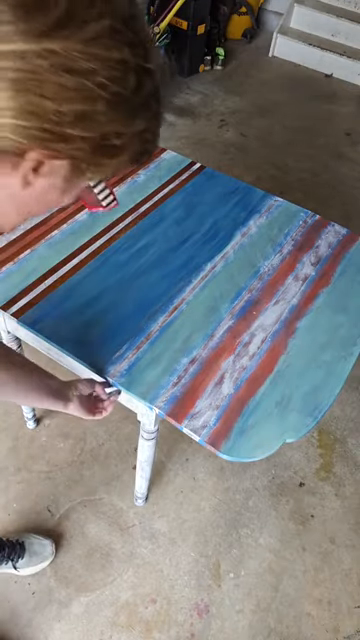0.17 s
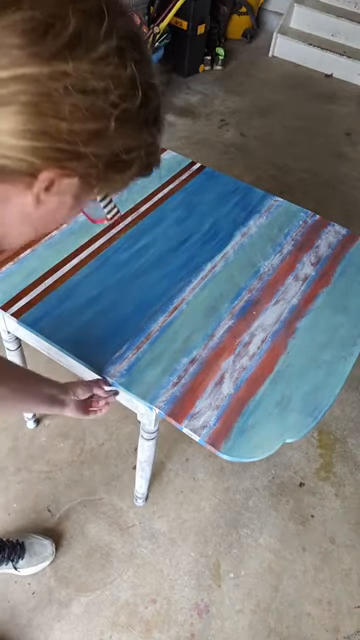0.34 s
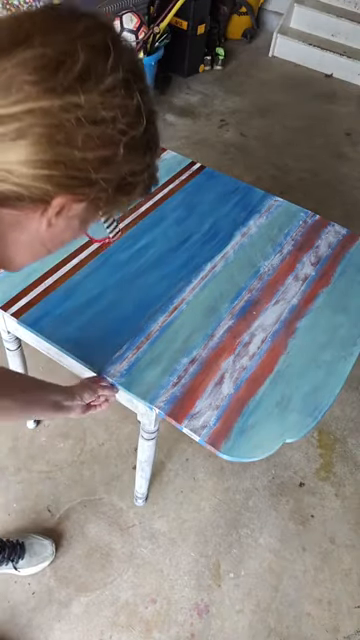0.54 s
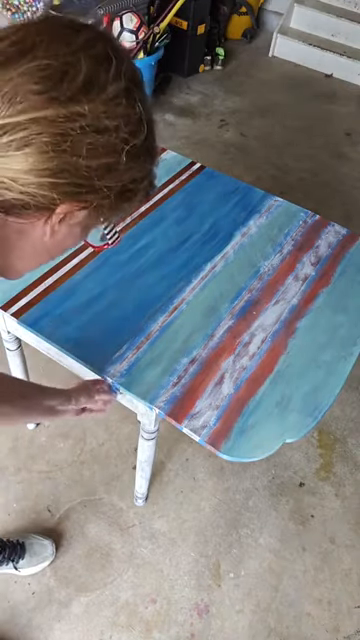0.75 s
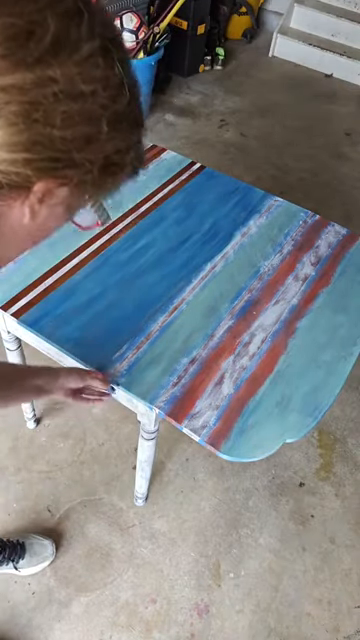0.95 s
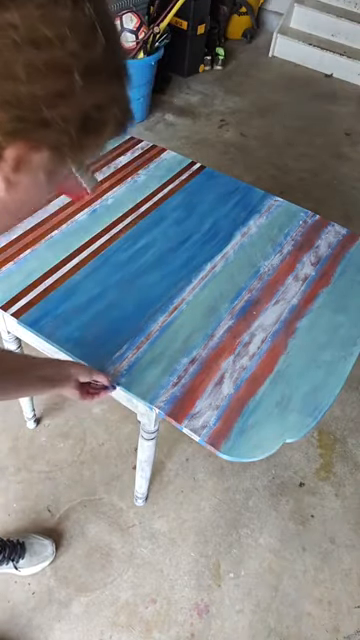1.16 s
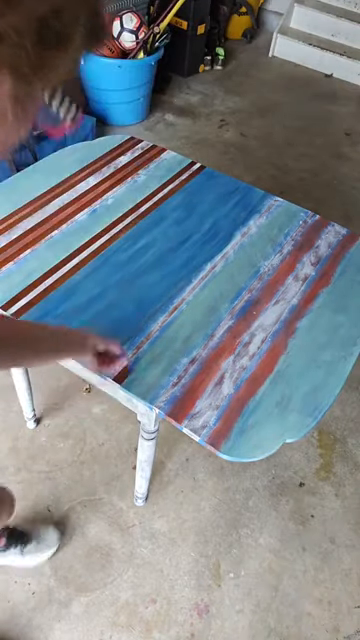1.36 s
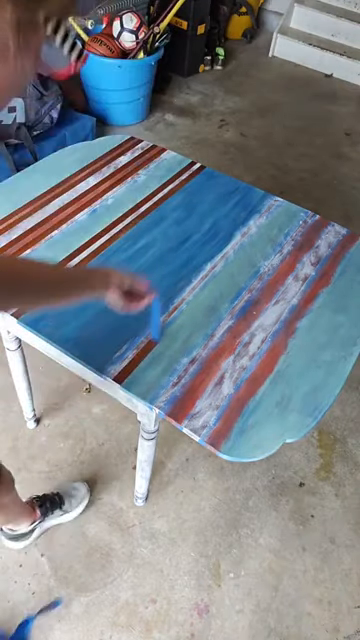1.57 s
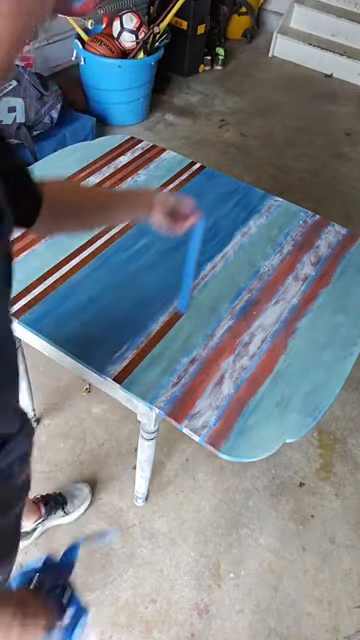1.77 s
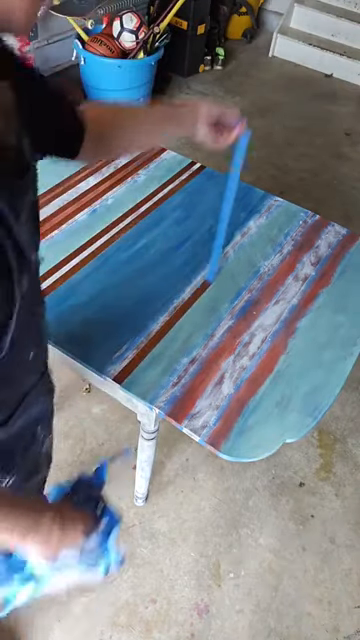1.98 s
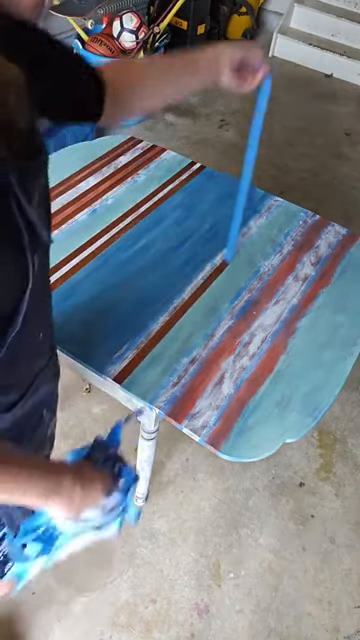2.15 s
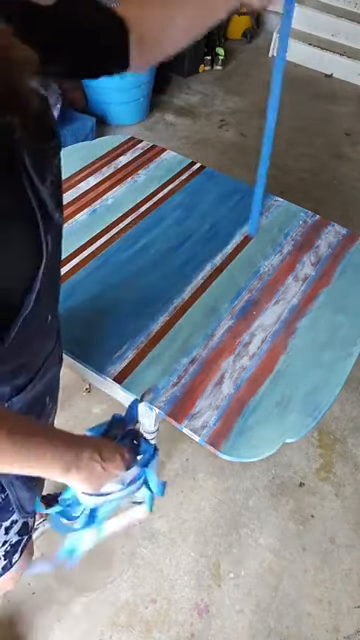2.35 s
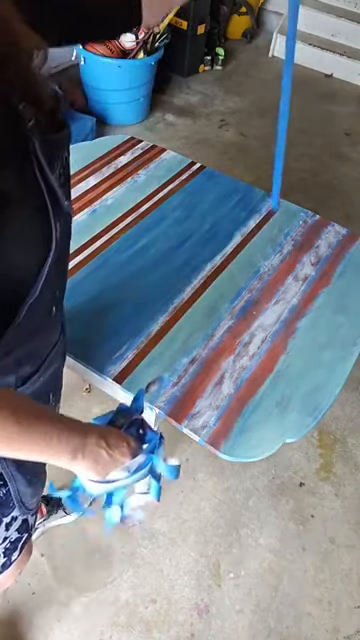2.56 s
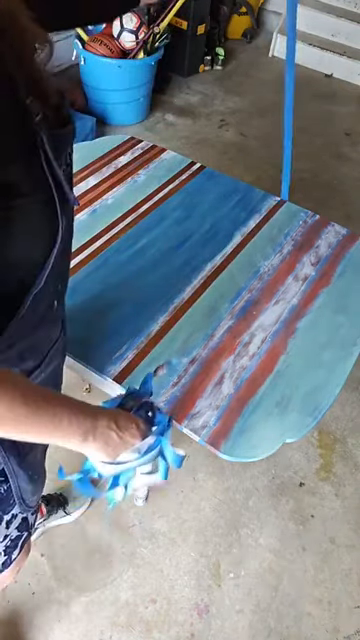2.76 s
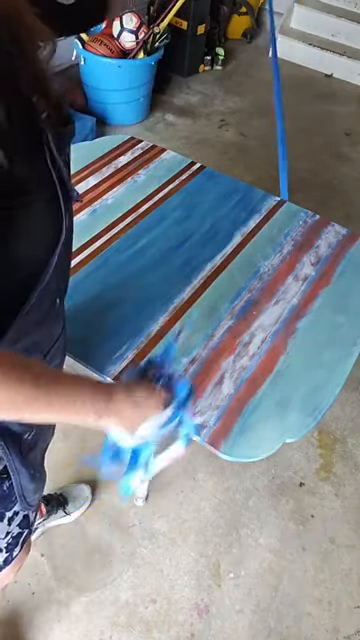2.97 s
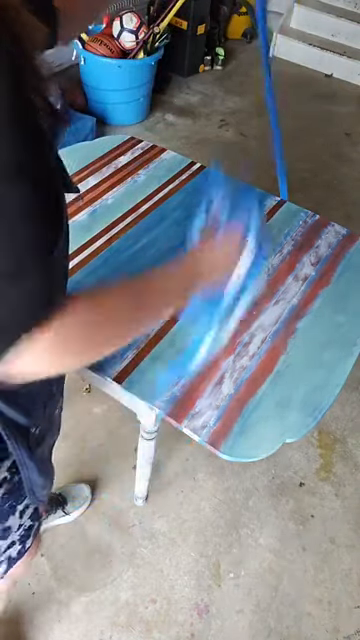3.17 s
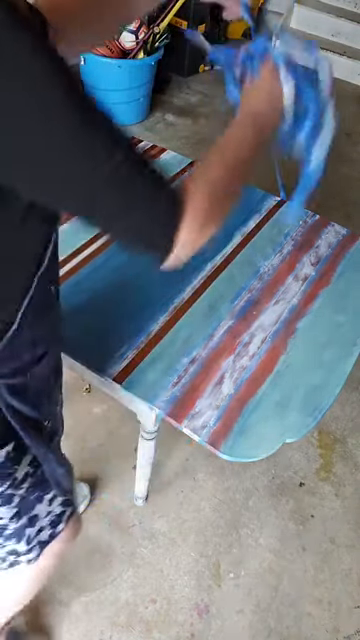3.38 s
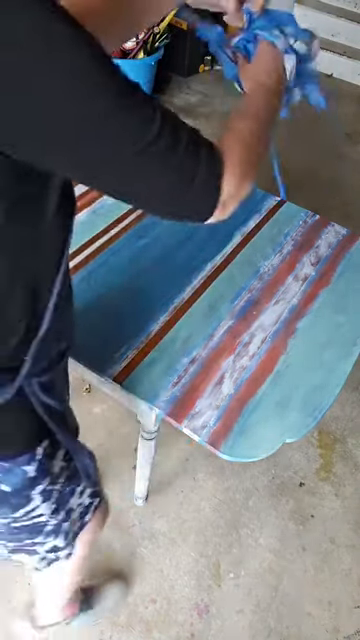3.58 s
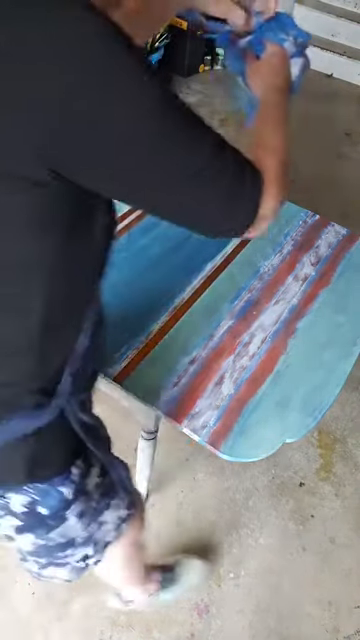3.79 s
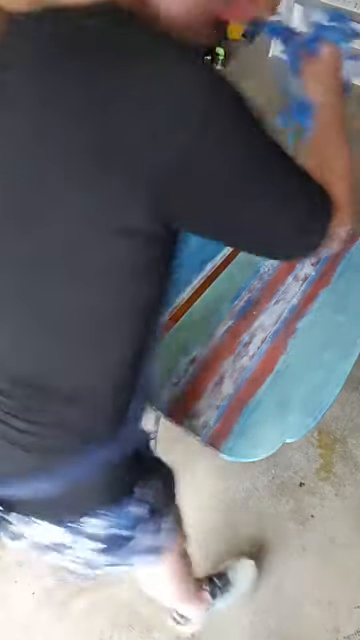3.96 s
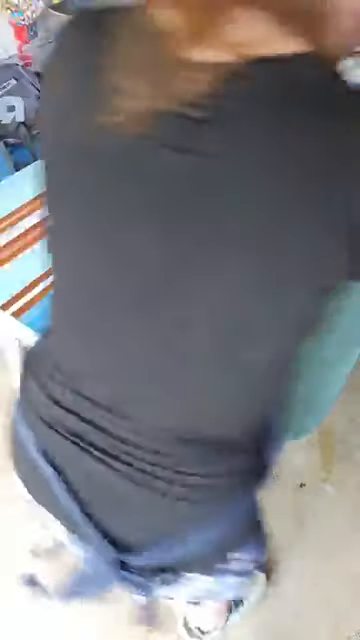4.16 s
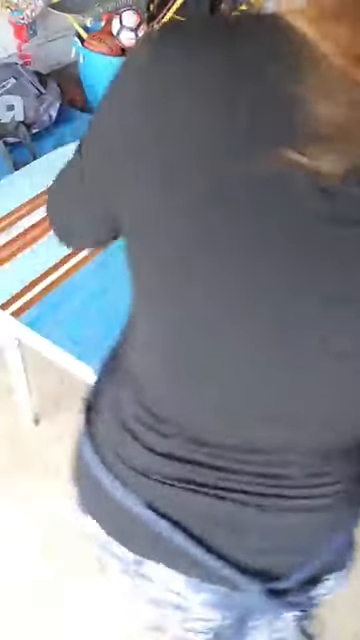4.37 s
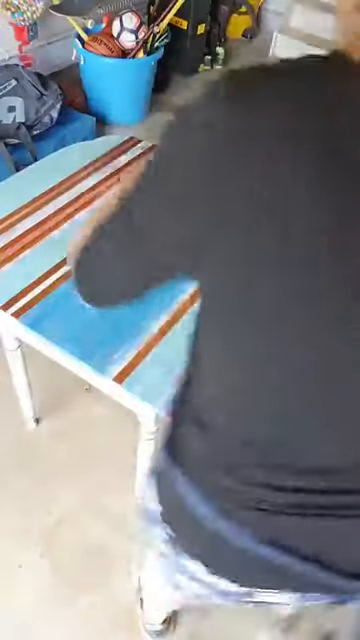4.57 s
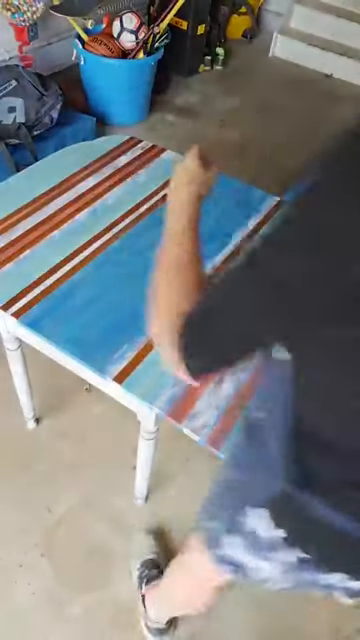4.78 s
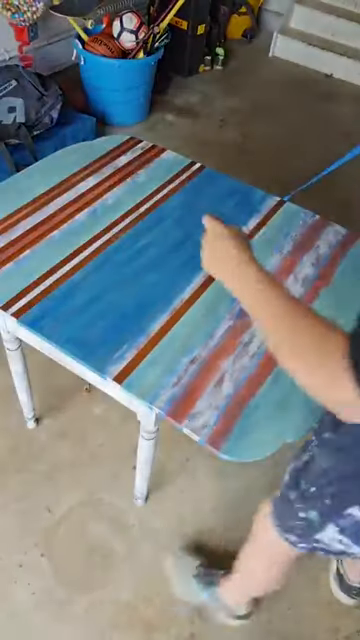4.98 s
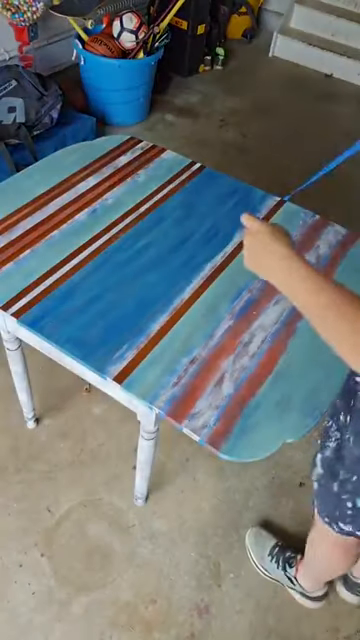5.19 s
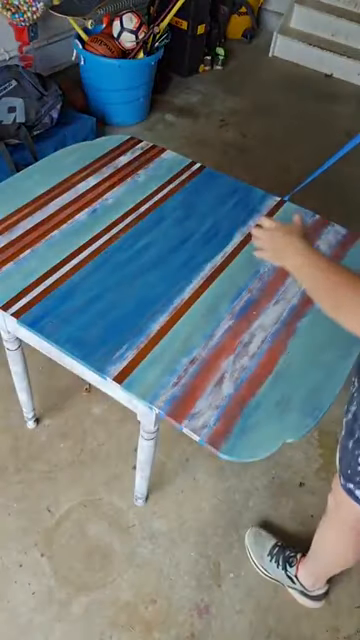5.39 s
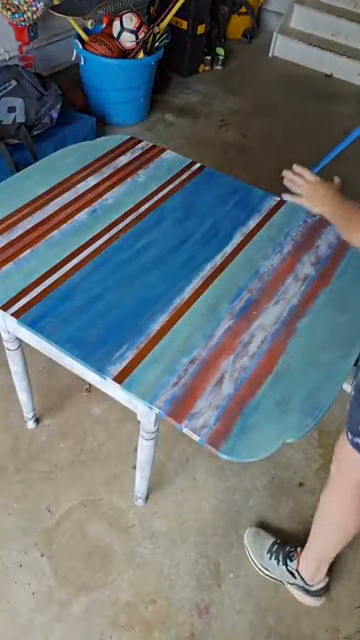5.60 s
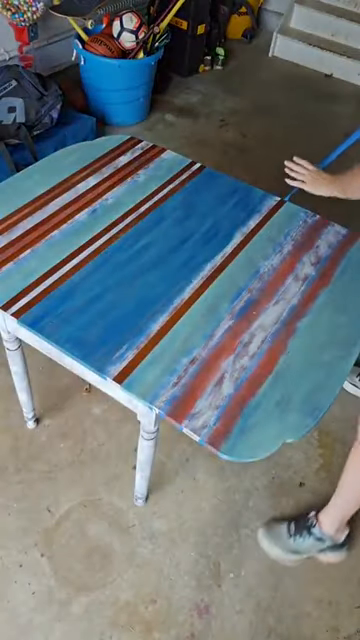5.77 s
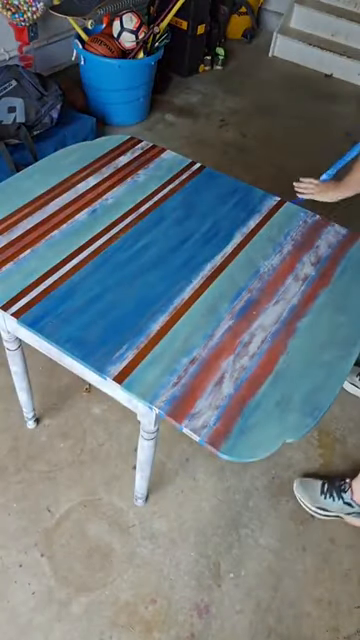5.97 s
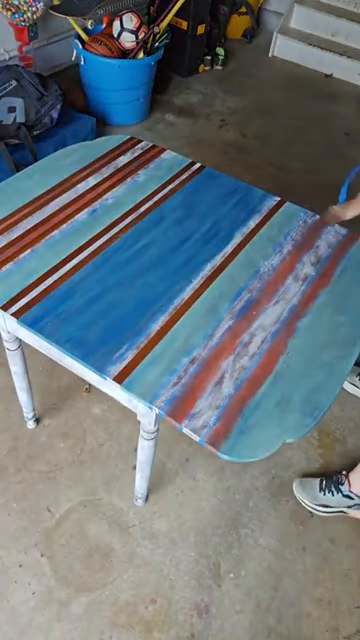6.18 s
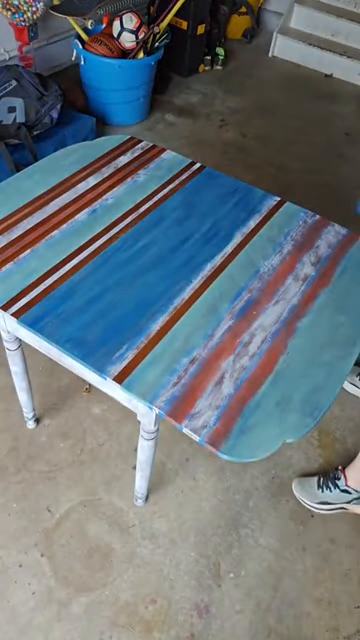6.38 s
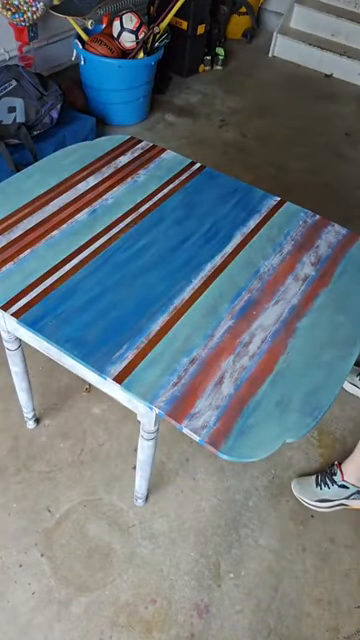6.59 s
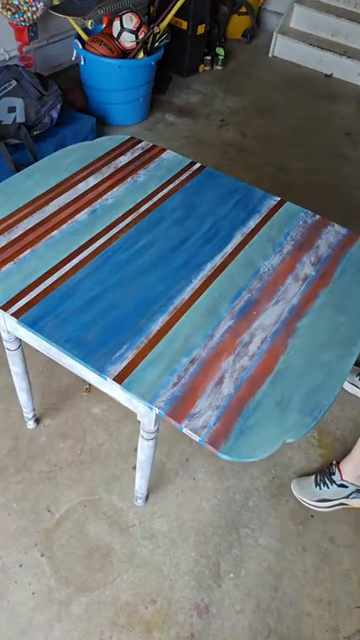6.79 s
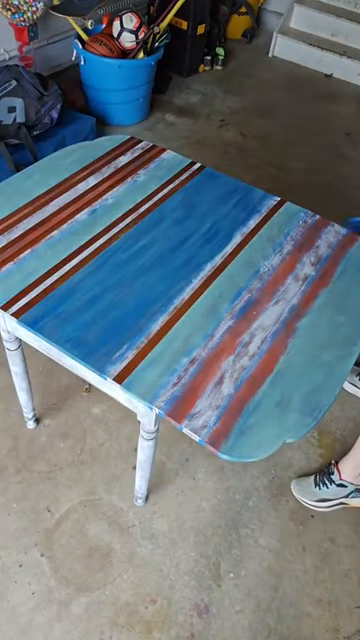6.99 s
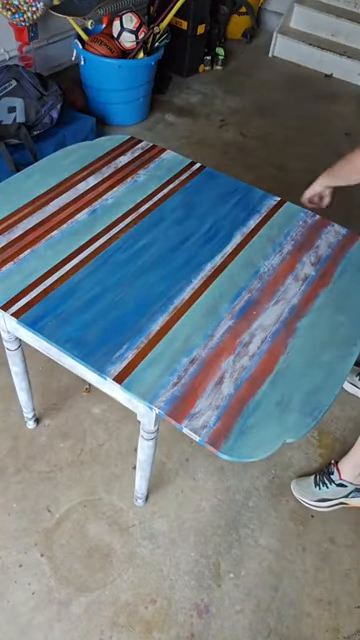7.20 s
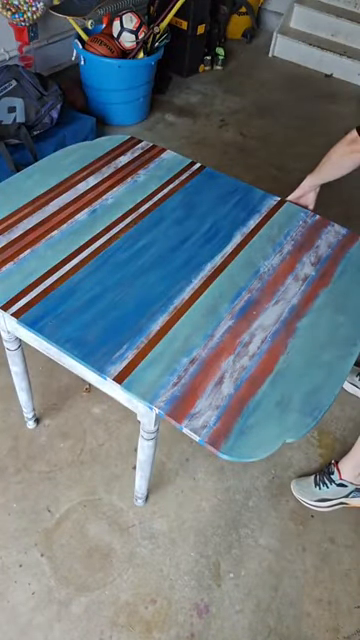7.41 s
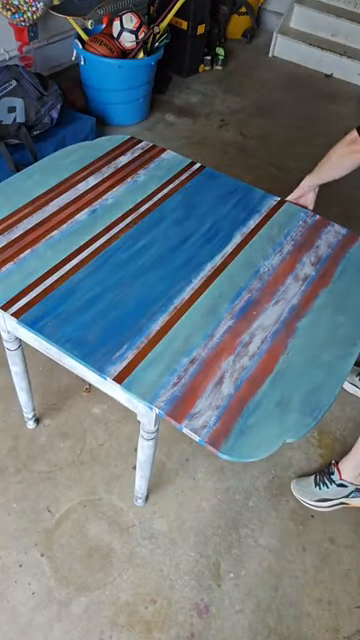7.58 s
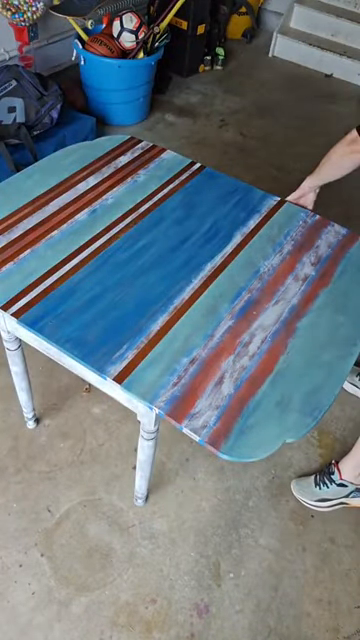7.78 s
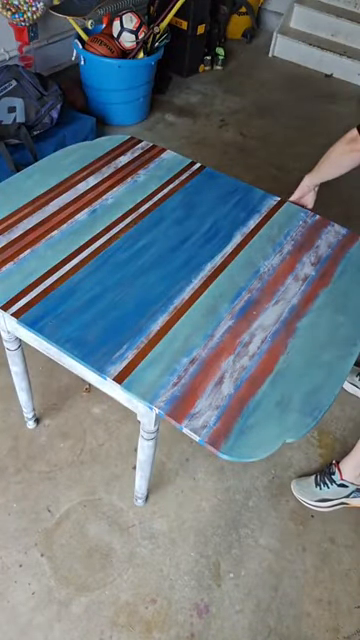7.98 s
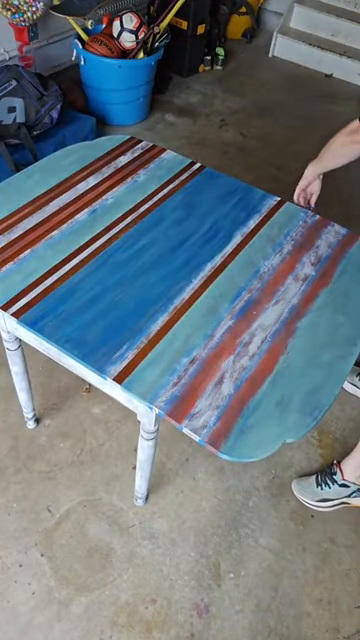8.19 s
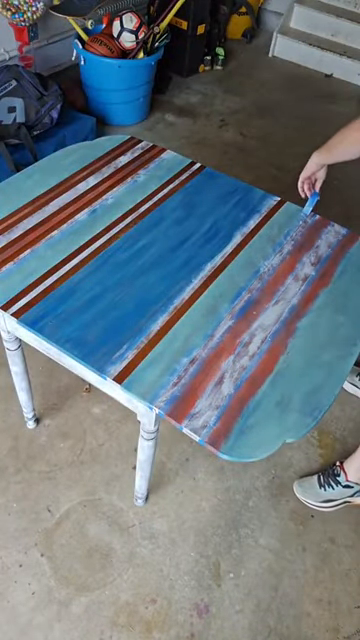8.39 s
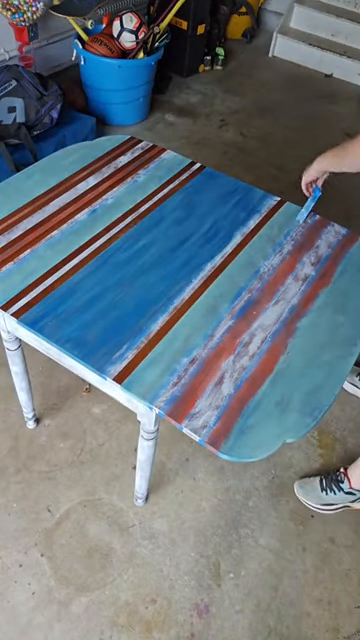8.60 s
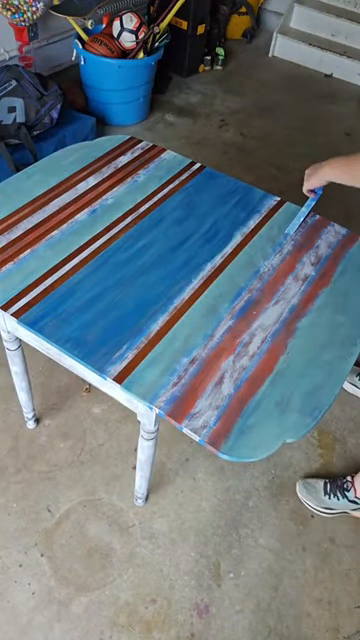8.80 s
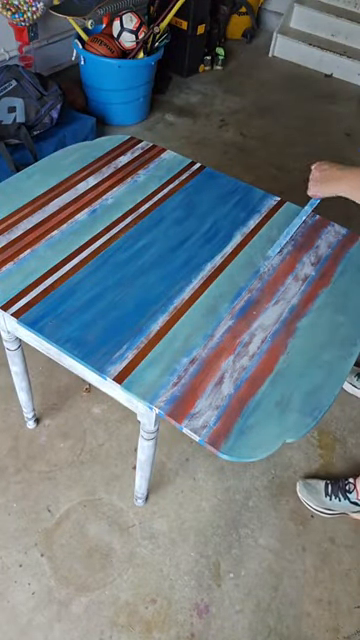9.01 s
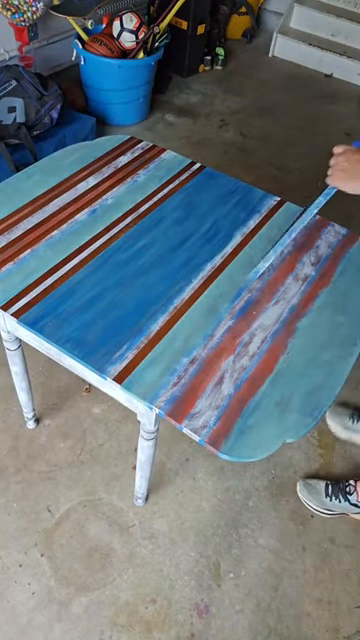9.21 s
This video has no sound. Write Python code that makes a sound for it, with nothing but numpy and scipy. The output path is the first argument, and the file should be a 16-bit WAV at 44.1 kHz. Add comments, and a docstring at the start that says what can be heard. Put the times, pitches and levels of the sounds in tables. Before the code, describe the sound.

In a bare, reverberant garage with a faint low hum, a small sharp snap and fingernail pick precede a long tape peel off a wooden table, drumming and rasping, rising in pitch as it speeds up. The loose tape crackles into a wad, shoes step and scuff on gritty concrete, more crumpling follows, then a second, shorter peel begins. Stereo microphones near the table catch the echo.

```python
"""Masking tape pulled off a table

Masking tape is pulled off a painted wooden table in a garage, in two rasping strips: tiny snaps of glue
drum on the resonant top and fizz in the air. Around the pulls, clumped crackles make the loose tape
crumple into a wad, and filtered grit makes shoes scuff and step on the concrete.
Sines and a wandering drone make machinery hum and waver faintly, over soft filtered-noise hiss."""
import sys
import numpy as np
from scipy import signal
from scipy.fft import rfft, irfft, next_fast_len
from scipy.io import wavfile
from scipy.ndimage import uniform_filter1d

SR = 44100
rng = np.random.default_rng(int(sys.argv[2]) if len(sys.argv) > 2 else 0)


def materialize(psi):
    """Save the field psi as 16-bit PCM at rate SR to the path in sys.argv[1].

    A 1-D psi becomes a single channel; in a 2-D psi each row is a channel.
    """
    bounded = np.clip(np.atleast_2d(psi).T, -1, 1)
    quanta = np.round(bounded * 32767).astype(np.int16)
    wavfile.write(sys.argv[1], SR, quanta)


N = 407925
TIME = np.arange(N) / SR

# modes of the table top: f/Hz, t60/s, level/dB along the first strip, level/dB along the second
TOP = [(63, .22, -5, -40), (97, .22, 1, -24), (133, .25, 1, 3), (151, .22, -1, -7), (229, .16, -12, -2),
       (262, .24, 1, -5), (291, .24, 4, -2), (347, .13, 4, 5), (481, .3, -2, -7), (547, .2, 0, 1),
       (667, .14, -3, -6), (806, .14, -1, -10), (888, .26, 1, 0), (975, .14, -4, -11), (1226, .22, -5, -7),
       (1644, .2, -9, -9)]


def amp(db):
    """Decibels to gain."""
    return 10 ** (np.asarray(db) / 20)


def evened(x):
    """Scales to an rms of 1."""
    return x / np.sqrt(np.mean(x ** 2) + 1e-20)


def peel(strip):
    """Threads of glue snap in uneven slips: each plucks the table and ticks in the air."""
    # spectrum of the board between its modes: f/Hz, level/dB
    board = [(85, -84), (135, 3), (195, -12.5), (300, 2.5), (600, 4), (900, 4.5), (1400, -4.5),
             (2000, -4.5), (3000, -13), (4500, -19), (7000, -29), (12000, -23)]
    # spectrum of the ticks in the air: f/Hz, level/dB
    tick_colour = [(900, 4.5), (2000, -3.5), (3200, -6), (4500, -4.5), (6500, -7), (9500, -7), (11000, -11),
                   (15500, -8)]
    easy_hz, split_hz, thump_hz = 400, 720, 152
    board_db, chatter_db, drum_db, crackle_db = 2, -8, -2, 2.5

    drum_gain, chatter_hz, fizz_gain = pull(strip, easy_hz)
    octaves = np.log2(chatter_hz / easy_hz)
    threads = shifting(grains(per_s=1600, spread_db=0.0, clump_db=2.0, clump_hz=89.7))

    # the peel line chatters at a pitch that follows the speed
    chatter = resonate(resonate(threads, chatter_hz, 93), chatter_hz, 80.6)
    chatter = amp(chatter_db) * evened(band(chatter, 190, "high"))

    # thump and rasp both grow as the pull gets faster
    wood = evened(table_top(threads, strip)) + amp(board_db) * evened(colour(threads, board))
    low = amp(drum_db) * evened(band(wood, split_hz, "low"))
    thump = amp(-3 + 3.5 * octaves) * band(low, thump_hz, "low")
    drum = band(low, thump_hz, "high")
    rasp = amp(-5.6 + 2.5 * octaves) * evened(band(wood, split_hz, "high"))

    # finer threads and stubborn spots join in the air
    fine_threads = grains(per_s=6800, spread_db=3.2, clump_db=1.0, clump_hz=60)
    crackle = amp(crackle_db) * grains(per_s=160, spread_db=1.8, clump_db=1.5, clump_hz=20)
    ticks = evened(colour(threads + fine_threads + crackle, tick_colour))

    stick_slip = evened(amp(.8 * drift(90)))
    return stick_slip * (drum_gain * (thump + drum + chatter + rasp) + fizz_gain * ticks)


def pull(strip, easy_hz):
    """The hand's force and tugs give the drumming gain, the speed as chatter in Hz, and the fizz gain."""
    # the pull on each strip: t/s, force as drumming level/dB, speed as chatter f/Hz
    pulls = [
        [(1.22, -80, 233), (1.41, -41.5, 261), (1.53, -42.5, 270), (1.76, -39, 312), (1.91, -35, 334),
         (2.08, -34.5, 440), (2.17, -38.5, 870), (2.32, -39.5, 890), (2.46, -36, 888), (2.67, -34.5, 980),
         (2.7, -38, 530)],
        [(8.45, -96, 400), (8.53, -46.5, 240), (8.6, -44.5, 196), (8.76, -44, 260), (8.92, -37.5, 413),
         (9.09, -38.5, 450), (9.25, -39, 394)],
    ]
    # tugs that rip the first strip over the edge and lift the end of the second: t/s, length/s, level/dB
    tug_rows = [
        [(2.564, 0.065, -40.5)],
        [(8.378, 0.031, -44.5), (8.431, 0.0093, -65)],
    ]
    # fizz of the glue in full flow at an easy speed: level/dB for the first strip, for the second
    full_fizz_db = [-44, -46]
    tug_speed_hz, tug_attack_s, tug_release_s, tug_fizz_db = 550, .012, .008, -2.5
    fizz_knee_db, fizz_db_per_octave = -51, 1.5  # well above the knee, force hardly adds fizz

    gate, force_db, speed_hz = follow(pulls[strip])
    steady = gate * amp(force_db)
    tugs = sum(amp(db) * stroke(s, length, tug_attack_s, tug_release_s)
               for s, length, db in tug_rows[strip])
    flow = steady / (steady + amp(fizz_knee_db))
    flow_db = full_fizz_db[strip] + fizz_db_per_octave * np.log2(speed_hz / easy_hz)
    fizz_gain = flow * amp(flow_db) + amp(tug_fizz_db) * tugs
    return np.hypot(steady, tugs), np.where(tugs > steady, tug_speed_hz, speed_hz), fizz_gain


def shifting(x, patchy_db=3.0, size=6):
    """The free tape changes length and tension, so its emphasis wanders from pitch to pitch."""
    z = signal.stft(x, nperseg=1024)[2]
    patches = uniform_filter1d(rng.standard_normal(z.shape), size=3, axis=0)
    patches = evened(uniform_filter1d(patches, size=size, axis=1))
    return evened(signal.istft(z * amp(patchy_db * patches))[1][:N])


def table_top(force, strip):
    """The wooden top rings; how strongly each mode answers depends on where the force acts."""
    t = TIME[:SR // 2]
    ring = np.zeros(len(t))
    for k, (hz, t60, *db) in enumerate(TOP):
        decay = amp(db[strip] - 60 * t / t60) / np.sqrt(t60)
        ring += decay * np.sin(2 * np.pi * hz * t) * (-1) ** k
    return signal.oaconvolve(force, ring / np.linalg.norm(ring))[:N]


def singing():
    """A mode rings when a finger rubs the tape's end, or the peel line crosses its belly."""
    # a finger rub at 0.538 s, then crossings of a belly: t/s, length/s, f/Hz of the mode,
    # level/dB before scaling by root length
    excitations = [(0.538, 0.034, 888, -70.5), (1.378, 0.2, 133, -47), (1.417, 0.45, 262, -43.5),
                   (1.504, 0.25, 97, -45.5), (1.78, 0.18, 291, -42), (1.919, 0.17, 547, -43),
                   (2.122, 0.17, 888, -41), (2.3, 0.39, 806, -43.5), (2.378, 0.32, 667, -48.5),
                   (2.381, 0.13, 547, -44), (2.425, 0.21, 1226, -47), (2.6, 0.061, 481, -45),
                   (2.6, 0.11, 547, -41.5), (8.53, 0.17, 133, -47.5), (8.604, 0.22, 1644, -54),
                   (8.638, .25, 229, -48), (8.719, 0.12, 1226, -52), (8.74, 0.23, 888, -46.5),
                   (8.929, 0.26, 347, -37.5), (9.041, 0.075, 547, -36), (9.04, 0.12, 1226, -50),
                   (9.078, .2, 262, -48), (9.168, 0.074, 1644, -47)]
    out, t = np.zeros(N), TIME[:SR]
    for s, length, hz, db in excitations:
        mode_hz, t60 = min(TOP, key=lambda mode: abs(mode[0] - hz))[:2]
        plucks = rng.standard_normal(SR) * np.sin(np.pi * np.minimum(t / length, 1))
        width_hz = np.log(1000) / np.pi / t60
        ring = resonate(plucks, np.full(SR, mode_hz), width_hz)
        add(out, s, amp(db) * np.sqrt(length) * evened(ring))
    return out


def knocks(ring_db=-20):
    """Dull blows on the table, which rings briefly after each."""
    # fingers and jerks of the tape knocking the table: t/s, level/dB, f/Hz, fade/s
    blow_rows = [(0.765, -51.5, 500, .007), (1.001, -55, 300, 0.0061), (1.503, -31, 300, 0.0084),
                 (1.912, -23.5, 380, 0.011), (3.068, -42, 600, 0.008), (8.0745, -32.5, 560, 0.0072),
                 (8.39, -38.5, 564, 0.0085), (8.434, -33.5, 590, 0.0063), (9.071, -33, 400, 0.013),
                 (9.152, -30.5, 376, 0.012), (9.238, -28, 370, .006)]
    blows = bursts(blow_rows, octaves=1.0, attack_s=0.00064)
    return blows + amp(ring_db) * table_top(blows, strip=1)


def leaning(sound):
    """The table radiates unevenly, so each pitch favours one side."""
    # balance of the table: f/Hz, left minus right level/dB
    balance = [(60, -3), (110, 2.5), (200, 1), (380, 2), (700, -1), (1290, 0.5), (8000, -0.6)]
    return np.array([colour(x, [(hz, side * db / 2) for hz, db in balance])
                     for x, side in zip(sound, (1, -1))])


def wad(level_db=2.0):
    """Crepe paper creases and unsticks in clumps of small crackles."""
    # squeezes of the loose tape: t/s, length/s, level/dB, swell over the squeeze/dB
    squeezes = [(0.74, 0.3, -74.5, -9), (3.02, 0.13, -65.5, 8.5), (3.253, 0.13, -50, 6.5),
                (3.45, 0.3, -53.5, -8.5), (3.82, 0.091, -51, 3.5), (3.943, 0.34, -61, -17),
                (6.192, 0.18, -59, 1), (6.431, 0.25, -53.5, 6), (6.741, 0.14, -56, -10),
                (6.888, 0.057, -50, -7), (6.99, 0.18, -52, -7)]
    # spectrum of the crepe paper: f/Hz, level/dB
    crepe = [(290, -3.5), (500, -10), (1160, -8), (1810, 2), (4020, 2), (7940, -3.5), (9720, -1.5),
             (10400, -5), (15000, -3.5), (15900, -3)]
    attack_s, release_s = 0.03, 0.039
    creases = grains(per_s=1900, spread_db=3.0, clump_db=2.7, clump_hz=40)
    squeeze = sum(amp(db) * stroke(s, length, attack_s, release_s, swell_db)
                  for s, length, db, swell_db in squeezes)
    return amp(level_db) * squeeze * evened(colour(creases, crepe))


def sharp_snaps(level_db=-6.0):
    """Short, bright bursts: creases snapping, a fingernail picking at the tape, one strike of a shoe."""
    # snaps and picks, and a shoe striking the concrete at 4.351 s: t/s, level/dB, f/Hz, fade/s
    snap_rows = [(0.6983, -17, 12600, 0.0039), (0.702, -25, 13500, 0.0086), (1.002, -40, 6500, 0.018),
                 (3.065, -35, 7900, 0.0088), (3.1345, -33, 2140, 0.0036), (3.281, -32, 4500, 0.011),
                 (3.3605, -28, 4500, 0.0036), (3.378, -28, 5000, 0.0027), (3.384, -30, 6000, 0.004),
                 (3.481, -21.5, 4500, 0.0032), (3.5245, -27, 2900, 0.003), (3.54, -33.5, 7200, .012),
                 (3.6245, -31, 3170, .003), (3.643, -29, 3300, 0.003), (3.6985, -31, 4100, 0.002),
                 (3.7155, -24, 3500, 0.0025), (3.7535, -27, 7340, 0.0055), (3.758, -38, 6500, 0.0021),
                 (3.9905, -34, 4500, 0.00093), (4.01, -30, 7100, 0.0029), (4.351, -30, 2180, 0.0046),
                 (6.648, -28.5, 5200, 0.017), (6.925, -30, 11200, 0.0065), (7.145, -28, 11400, 0.0071),
                 (8.0755, -27, 14500, 0.033), (8.39, -46, 2950, 0.012), (8.436, -35, 1800, .004)]
    return amp(level_db) * band(bursts(snap_rows, octaves=0.89, attack_s=.0005), 610, "high")


def shoes():
    """Feet land with a dull thud and slide over the concrete."""
    # feet landing: t/s, level/dB, f/Hz, fade/s
    steps = [(4.2, -52, 487, 0.021), (4.6, -54.5, 328, 0.034), (4.79, -49.5, 350, 0.024),
             (4.835, -46, 165, 0.016), (5.222, -49, 380, 0.012), (5.688, -42.5, 400, 0.0083),
             (5.985, -40, 170, 0.018)]
    # slides: t/s, length/s, level/dB, swell over the slide/dB, attack/s, weight on the foot as bass/dB,
    # grit as treble/dB, judder f/Hz, judder level/dB, judder width/octaves
    slides = [(0.1, 0.036, -37.5, -2, .006, 1, 3, 3100, 8, .65),
              (4.126, 0.082, -48, 4.5, .012, 5, 3, 1900, 4, .6),
              (4.343, 0.08, -39.7, 7, .012, 0, 4, 2000, 6, .45),
              (4.44, 0.2, -57, -14, .02, 3, 3, 1200, 3, .6), (4.785, 0.1, -59, 3, .01, 10, -2, 900, 4, .6),
              (4.87, 0.122, -41.5, -3, .035, -1, -2, 1200, 1.5, .8),
              (5.124, 0.016, -46, -2, .003, 0, 3, 1530, 17, .16),
              (5.136, 0.072, -46.5, -3, .01, -1, 2, 1450, 6, .55),
              (5.225, 0.13, -59, -9.5, .01, 0, 1, 1370, 3, .6),
              (5.58, 0.15, -61, 5, .02, 6, 3, 1700, 7, .45),
              (5.725, 0.21, -53.5, 1, .02, 3, 5, 2000, 7, .35),
              (5.92, 0.085, -42.7, 4, .055, 2, 7.5, 2200, 6.5, .62)]
    out = bursts(steps, octaves=0.72, attack_s=0.00093)
    for s, length, db, *manner in slides:
        add(out, s, amp(db) * scuff(length, *manner))
    return out


def scuff(length, swell_db, attack_s, weight_db, grit_db, judder_hz, judder_db, judder_octaves):
    """One slide of a rubber sole: grains of grit catch, and the tread judders around its own pitch."""
    # basic spectrum of the sole: f/Hz, level/dB
    sole = [(100, -5), (200, -5.5), (380, -7.5), (560, -0.5), (1000, -1.5), (1700, -1.5), (2300, -1),
            (3200, -4), (4500, -5.5), (7000, -10), (10000, -12.5), (15500, -17)]
    weight_hz, grit_hz, release_s = 446, 4800, 0.0052  # weight adds body below, sand hisses above
    t, hz = TIME[:SR // 2], np.geomspace(80, 16000, 80)
    tread = judder_db * np.exp(-.5 * (np.log2(hz / judder_hz) / judder_octaves) ** 2)
    weight = weight_db / (1 + (hz / weight_hz) ** 2)
    grit = grit_db / (1 + (grit_hz / hz) ** 4)
    shape_db = read(sole, hz) + tread + weight + grit
    catches = grains(per_s=4500, spread_db=2.6, clump_db=2.8, clump_hz=140, size=len(t))
    scrape = colour(catches, np.c_[hz, shape_db])[:len(t)]
    return evened(scrape) * stroke(0, length, attack_s, release_s, swell_db)[:len(t)]


def hum():
    """Steady motor tones waver slightly in level and phase."""
    # tones of the motor: f/Hz, level/dB
    tones = [(59.9, -72), (119.8, -68), (240.3, -73)]
    return np.sqrt(2) * sum(amp(db + 2.2 * drift(5)) * np.sin(2 * np.pi * hz * TIME + .4 * drift(5))
                            for hz, db in tones)


def drone_and_rumble(waver_db=2.5):
    """A low drone swells and fades; a rumble beats against the hum and sinks with a weak drone."""
    # swell of the drone: t/s, level/dB
    swell = [(0, -59), (.25, -61), (.55, -75), (1.3, -59), (3.1, -62), (4.3, -57.5), (5.6, -62.5),
             (6.1, -56.5), (7.45, -56.5), (7.95, -69), (9.25, -67)]
    rumble_full_db, rumble_share = -58.5, 0.34  # the rumble takes this share of the drone's fall below
    level_db = follow(swell)[1]
    drone_gain = amp(level_db - 1 + waver_db * drift(17))
    sink_db = rumble_share * np.minimum(level_db - rumble_full_db, 0)
    rumble_gain = amp(-61.5 + sink_db + waver_db * drift(7.6))
    drone = drone_gain * wandering(92.4, wander_hz=1.11)
    rumble = rumble_gain * wandering(58, wander_hz=1.04)
    return np.sqrt(2) * (drone + rumble)


def hiss(level_db=-62.0):
    """Soft coloured noise, diffuse at the two microphones."""
    # spectrum of the hiss: f/Hz, level/dB
    hiss_colour = [(20, -24), (45, -18.5), (130, -12.5), (250, -16), (450, -31), (650, -34), (850, -26.5),
                   (1100, -35), (3500, -41.5), (6800, -30.5), (7600, -22), (8300, -34), (11500, -33),
                   (14500, -24)]
    hz = np.fft.rfftfreq(N, 1 / SR)
    noise = pair(rfft(rng.standard_normal((2, N))), hz)
    return amp(level_db) * evened(irfft(noise * amp(read(hiss_colour, hz)), N))


def garage(x, wet_db, lag_ms):
    """Direct sound, later at the left microphone by the lag, and the dense echo of bare walls."""
    # reverberation of the garage: f/Hz, t60/s
    room = [(140, 0.54), (520, 0.41), (1400, 0.4), (3700, 0.43), (9000, 0.36), (15000, 0.15)]
    count = 30000
    taps = rng.choice([-1., 1.], (2, count)) * (rng.random((2, count)) < .12) * (TIME[:count] > .003)
    hz, t, z = signal.stft(taps, SR, nperseg=256)
    decay = amp(-60 * t / read(room, hz)[:, None])
    tail = signal.istft(pair(z, hz[:, None]) * decay, SR, nperseg=256)[1]
    echo = amp(wet_db) * tail / np.linalg.norm(tail, axis=1, keepdims=True)
    lag = round(lag_ms * SR / 1000)
    echo[0, max(lag, 0)] += 1
    echo[1, max(-lag, 0)] += 1
    return signal.oaconvolve(x[None], echo / np.sqrt(1 + amp(wet_db) ** 2), axes=1)[:, :N]


def moving(x, wet_db, lag_ms, count=3):
    """The echoes of a moving source change: a few echo patterns crossfade in a one-second cycle."""
    turns = [np.cos(np.pi * (TIME + k / count)) ** 4 for k in range(count)]
    power = np.sqrt(sum(w ** 2 for w in turns))
    return sum(garage(x * w / power, wet_db, lag_ms) for w in turns)


def pair(z, hz, likeness=0.1, bass_hz=380, mic_gap_m=.14):
    """Diffuse sound at two microphones: alike in the bass, nearly unrelated in the treble."""
    loss = (1 - likeness) * hz ** 2 / (hz ** 2 + bass_hz ** 2)
    same = np.sinc(2 * hz * mic_gap_m / 343) * (1 - loss)  # speed of sound 343 m/s
    return np.array([z[0], same * z[0] + np.sqrt(1 - same ** 2) * z[1]])


def grains(per_s, spread_db, clump_db, clump_hz, size=N):
    """Random clicks of uneven size that come in louder and softer clumps."""
    spread = spread_db * np.minimum(rng.exponential(1, size), 4)
    clumps = clump_db * np.clip(drift(clump_hz, size=size), -2, 2)
    clicks = rng.choice([-1, 1], size) * (rng.random(size) < per_s / SR)
    return evened(amp(spread + clumps) * clicks)


def bursts(rows, octaves, attack_s):
    """Short noise bursts with a quick attack and a fade, each around its own pitch."""
    out, t, hz = np.zeros(N), TIME[:8192], np.fft.rfftfreq(8192, 1 / SR)
    for s, db, pitch, fade_s in rows:
        shape = 1 + (np.log2((hz + 1) / pitch) / octaves) ** 2
        noise = irfft(rfft(rng.standard_normal(len(t))) / shape)
        burst = noise * np.minimum(t / attack_s, 1) * np.exp(-t / fade_s)
        add(out, s, amp(db) * burst / abs(burst).max())
    return out


def stroke(start, length, attack_s, release_s, swell_db=0):
    """Gain of one movement: a quick attack, a hold that swells or sags about its middle, a release."""
    t = TIME - start
    hold = amp(swell_db * (np.clip(t / length, 0, 1) - .5))
    return np.clip(t / attack_s, 0, 1) * hold * np.exp(-np.maximum(t - length, 0) / release_s)


def resonate(x, hz, width_hz):
    """A resonance of gain 1 that follows the curve hz."""
    turn = np.exp(2j * np.pi * np.cumsum(hz) / SR)
    r = np.exp(-np.pi * width_hz / SR)
    return 2 * (turn * signal.lfilter([1 - r], [1, -r], x / turn)).real


def wandering(hz, wander_hz):
    """A tone whose pitch strays slowly."""
    return np.sin(2 * np.pi * np.cumsum(hz + wander_hz * drift(1.54)) / SR)


def drift(rate_hz, size=N):
    """Slow chance with an rms of 1."""
    fast = next_fast_len(size, True)
    slow = rfft(rng.standard_normal(fast)) / (1 + (np.fft.rfftfreq(fast, 1 / SR) / rate_hz) ** 4)
    return evened(irfft(slow, fast)[:size])


def colour(x, points):
    """Causal minimum-phase filter with the given spectrum, so that clicks keep their sharp fronts."""
    log_gain = np.log(amp(np.maximum(read(points, abs(np.fft.fftfreq(4096, 1 / SR))), -100)))
    taps = np.fft.ifft(np.exp(signal.hilbert(log_gain).conj())).real[:2048]
    return signal.oaconvolve(x, taps)[:N]


def band(x, hz, kind, order=3):
    """Low-pass or high-pass."""
    return signal.sosfilt(signal.butter(order, min(hz, SR / 2 - 1), kind, fs=SR, output="sos"), x)


def read(points, hz):
    """Reads a spectrum on a log-frequency axis."""
    f, value = np.transpose(points)
    return np.interp(np.log(hz + 1), np.log(f + 1), value)


def follow(rows):
    """A gate that is open while a curve lasts, then the curve's columns at every sample."""
    s, *columns = np.transpose(rows)
    gate = uniform_filter1d(((TIME >= s[0]) & (TIME <= s[-1])) * 1., size=300)
    return [gate] + [np.interp(TIME, s, c) for c in columns]


def add(mix, s, sound):
    """Adds a sound at time s."""
    part = mix[max(round(s * SR), 0):][:len(sound)]
    part += sound[:len(part)]


def scene():
    """The table reaches both sides at once, the wad and sharp snaps the left first, the feet the right."""
    strips = moving(peel(0) + peel(1), wet_db=7.0, lag_ms=0)
    modes = garage(singing(), wet_db=-1, lag_ms=0)
    table = leaning(strips + modes + garage(knocks(), wet_db=4.0, lag_ms=0))
    crumple = moving(wad(), wet_db=4, lag_ms=-0.2)
    snaps = garage(sharp_snaps(), wet_db=-4, lag_ms=-.16)
    feet = moving(shoes(), wet_db=6.5, lag_ms=.21)
    background = hum() + drone_and_rumble() + hiss()
    mix = table + crumple + snaps + feet + background
    return mix * amp([[1.05], [-1.05]])  # dB: the whole mix leans left


def record(dry):
    """A steep low-pass ends the treble near 15.9 kHz."""
    taps = signal.firwin(511, 15900, window=("kaiser", 9), fs=SR)
    return signal.oaconvolve(dry, taps[None], "same")


dry = scene()
out = record(dry)
materialize(out)
```